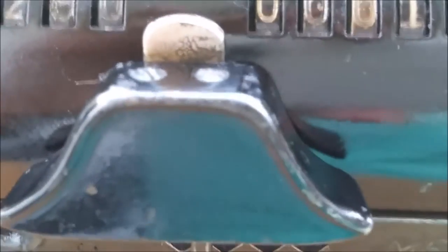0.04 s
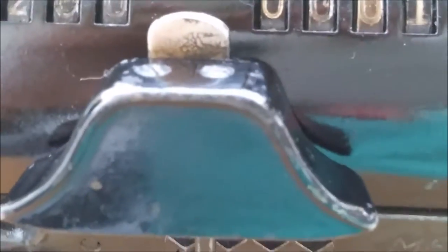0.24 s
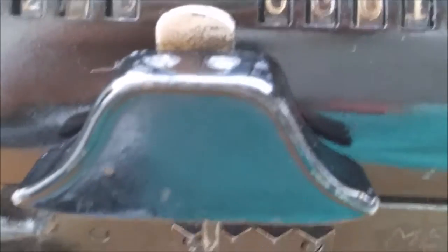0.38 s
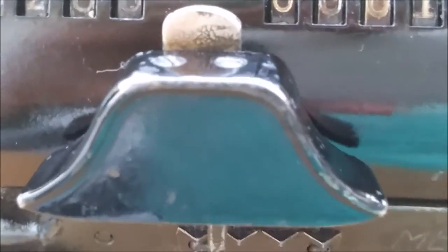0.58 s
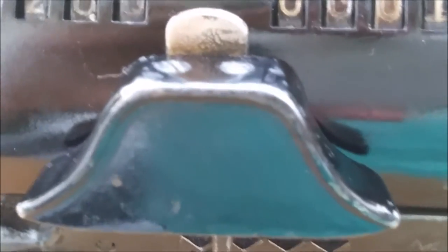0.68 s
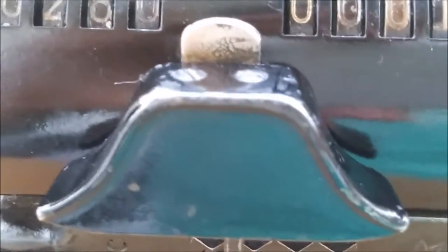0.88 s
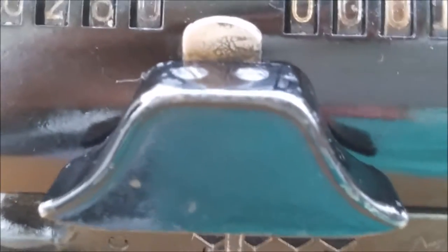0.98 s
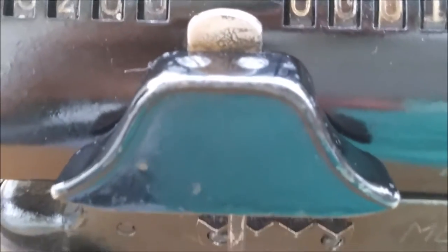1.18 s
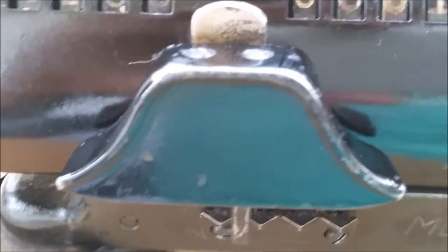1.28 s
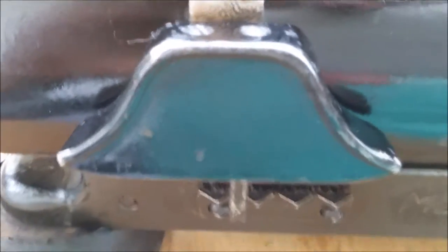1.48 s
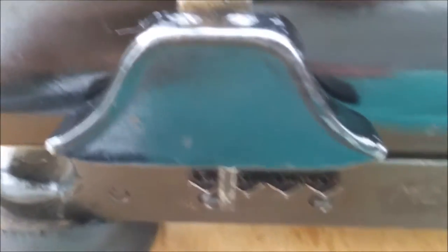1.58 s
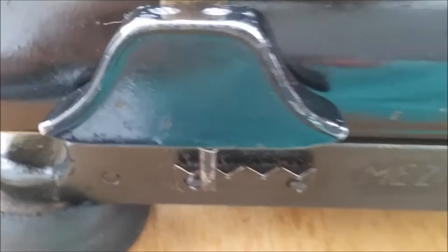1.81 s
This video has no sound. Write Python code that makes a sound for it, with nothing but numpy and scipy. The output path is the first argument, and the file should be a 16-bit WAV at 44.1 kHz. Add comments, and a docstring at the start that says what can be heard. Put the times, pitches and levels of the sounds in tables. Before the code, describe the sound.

A mechanical calculator is operated once, very close: a short metal scrape with ticking latches, hard steel clacks, a fast ratchet buzz that slows into fading ticks, then faint knocks in a small quiet room.

```python
"""A mechanical calculator is worked once, close up in a small quiet room: noise bursts and ringing steel modes.
Its slide scrapes (grainy noise) and latches tick; steel parts clack hard. A driven ratchet whirrs (near-identical
clicks at tooth rate), then coasts to rest, its pawl ticking ever slower over pinging spring chirps.
Soft knocks (filtered bursts) come early and again after the wheel stops, over low room noise and a faint hum."""
import sys
import numpy as np
from scipy import signal
from scipy.fft import rfft, irfft, next_fast_len
from scipy.io import wavfile
from scipy.ndimage import uniform_filter1d, minimum_filter1d, map_coordinates

SR = 44100
rng = np.random.default_rng(int(sys.argv[2]) if len(sys.argv) > 2 else 0)


def log_audio(samples):
    """Write samples as a 16-bit WAV file to the path given in sys.argv[1]."""
    # one column per channel
    frames = np.atleast_2d(samples).T
    # limit to full scale, then quantise
    limited = np.clip(frames, -1, 1)
    pcm = np.round(limited * 32767).astype(np.int16)
    wavfile.write(sys.argv[1], SR, pcm)


N = 81585
T = np.arange(N) / SR
AGE = np.arange(SR // 5) / SR  # s since a contact
TOP_HZ = 16900
FRAME_DB, PAWL_DB = -26, -19  # ring levels relative to their hit
TOOTH_T60_S = .006
REBOUND_S = .0033
SPRING_HZ = 4450

# ringing modes of the steel frame: pitch_hz, level_db (relative), t60_s
FRAME_MODES = [(1130, -5, .08), (1243, -4, .11), (1884, -1, .07), (2588, 5, .05), (4163, -1, .06),
               (4310, 1, .055), (5594, 0, .065), (6748, 1, .065), (6900, 0, .065), (8010, 1, .055),
               (8690, 0, .07)]
# ringing modes of the pawl: pitch_hz, level_db (relative), t60_s
PAWL_MODES = [(1235, -8, .07), (4560, -5, .03), (7650, -1, .05), (8180, 0, .04), (8455, 0, .04),
              (9840, -7, .05)]


def amp(db):
    """Decibels to gain."""
    return 10 ** (np.asarray(db) / 20)


def unit(x):
    """Scale to rms 1."""
    return x / np.sqrt(np.mean(x ** 2) + 1e-20)


def fade(t60_s):
    """Exponential decay, 60 dB in t60_s."""
    return np.exp(-np.log(1000) * AGE / t60_s)


def add(track, start_s, sound):
    """Mix a sound into a track, cut at the track's end."""
    part = track[round(start_s * SR):][:len(sound)]
    part += sound[:len(part)]


def coloured(x, points):
    """Causal minimum-phase filter of unit power through (Hz, dB) points."""
    size = next_fast_len(2 * N)
    hz, db = np.transpose(points)
    log_hz = np.log(np.fft.rfftfreq(size, 1 / SR) + 1)
    gain = unit(amp(np.interp(log_hz, np.log(hz), db)))
    # fold the cepstrum forward in time: minimum phase
    cepstrum = irfft(np.log(gain), size)
    cepstrum[1:size // 2] *= 2
    cepstrum[size // 2 + 1:] = 0
    return irfft(rfft(x, size) * np.exp(rfft(cepstrum)), size)[:N]


def burst(t60_s):
    """Dense, quickly dying vibration of one contact; equal energy for equal t60_s."""
    envelope = fade(t60_s)
    noise = unit(rng.standard_normal(len(AGE)) * envelope)
    return noise * np.sqrt(np.mean(envelope ** 2))


def ring(modes, attack_s=0.00013):
    """Decaying modes, each struck with slightly different force and a random phase."""
    tones = np.zeros(len(AGE))
    for hz, db, t60_s in modes:
        level = amp(db + rng.normal(0, 0.91))
        tones += level * fade(t60_s) * np.sin(2 * np.pi * (hz * AGE + rng.random()))
    return tones * (1 - np.exp(-AGE / attack_s))


def ping(hz, chirp_hz=1100, chirp_max_s=.002, t60_s=.024):
    """Flicked spring: high notes arrive first, so it swells while falling to a slightly random pitch."""
    onset = np.exp(-AGE / (chirp_max_s * rng.uniform(.5, 1)))
    pitch_hz = hz * rng.normal(1, .025) + chirp_hz * onset
    turns = np.cumsum(pitch_hz) / SR + rng.random()
    return 2 * (1 - onset) * fade(t60_s) * np.sin(2 * np.pi * turns)


def teeth(speed, force):
    """(start_s, level_db) of each tooth passing the pawl: whole turns of the integrated tooth rate."""
    s, rate = np.transpose(speed)
    t = np.arange(s[0], s[-1], 1 / SR)
    passed = np.cumsum(np.interp(t, s, rate)) / SR
    times = np.interp(np.arange(passed[-1]), passed, t)
    levels_db = np.interp(times, *np.transpose(force)) + rng.standard_normal(len(times))
    return zip(times, levels_db)


def room_tone(floor_db=-72, hum_hz=98.3, hum_db=-77, swell_s=0.059):
    """Steady low noise, a faint phase-wavering hum and slight hollow noise swells."""
    # room noise spectrum: pitch_hz, level_db (relative)
    noise_colour = [(25, -18.5), (100, -5), (260, -6.5), (440, -17), (700, -13.5), (1600, -23),
                    (16000, -35.5)]
    # noise swells: peak_s, level_db, centre_hz
    swells = [(0.036, -66, 638), (1.16, -71, 634), (1.801, -70.5, 270.7)]
    # swell spectrum: centre_multiple, level_db (relative)
    swell_colour = [(.75, -29.5), (1, -8.5), (1.45, -21), (5, -34.5)]
    out = amp(floor_db) * coloured(rng.standard_normal(N), noise_colour)
    waver_rad = map_coordinates(rng.standard_normal(N), [T * 10])
    out += amp(hum_db) * np.sin(2 * np.pi * hum_hz * T + waver_rad)
    for s, db, hz in swells:
        noise = coloured(rng.standard_normal(N), [(k * hz, g) for k, g in swell_colour])
        out += amp(db) * np.exp(-((T - s) / swell_s) ** 2) * noise
    return out


def slide(grain_db=4, grains_per_s=900):
    """Metal parts rub in tiny uneven slips: noise with a randomly varying level."""
    # sliding friction: time_s, level_db
    friction = [(0.119, -63), (0.179, -59.5), (.184, -33), (0.203, -41.5), (0.206, -58.5), (0.217, -35.5),
                (0.282, -37), (.298, -45.5), (.320, -41), (0.365, -34.5), (0.387, -50), (0.429, -76),
                (0.441, -39), (.530, -32), (.590, -42.5), (.700, -48), (.745, -65), (.88, -82)]
    # scrape spectrum: pitch_hz, level_db (relative)
    colour = [(100, -29), (850, -10), (1180, 2.5), (1500, -7.5), (1900, -1.5), (2900, -9.5), (4300, 2),
              (5600, -4), (8300, -3.5), (10500, -9.5), (12500, -23.5)]
    s, db = np.transpose(friction)
    slips = map_coordinates(rng.standard_normal(N), [T * grains_per_s])
    grit = unit(rng.standard_normal(N) * amp(grain_db * slips))
    moving = (T > s[0]) * (T < s[-1])
    return coloured(grit * amp(np.interp(T, s, db)) * moving, colour)


def nudges(t60_s=0.029, dip_db=-11, top_db=-25):
    """Soft knocks of loose parts and of the case: bursts with one bright peak and some bass."""
    # knocks: start_s, level_db, brightest_hz, bass_db (relative)
    knocks = [(0.1228, -50.5, 1770, -14), (0.2784, -32, 1230, -38), (1.0462, -63.5, 3780, -25),
              (1.1444, -74, 4500, -14), (1.7164, -52, 1652, 6.5), (1.7290, -50, 4170, 10)]
    out = np.zeros(N)
    for s, db, hz, bass_db in knocks:
        colour = [(40, top_db), (130, bass_db), (hz / 2, dip_db), (hz, 0), (2 * hz, dip_db), (TOP_HZ, top_db)]
        add(out, s, amp(db) * coloured(burst(t60_s), colour))
    return out


def latches(t60_s=.008, spring_hz=4016, spring_db=-12.5):
    """Small sprung parts click into place, ringing the frame and pinging a spring."""
    # latch ticks: start_s, level_db
    ticks = [(0.1891, -22), (0.2206, -16), (0.2268, -20), (0.2314, -23), (0.2421, -23), (.2481, -26.5),
             (.2535, -28.5), (0.2666, -17.5), (0.2737, -23.5), (0.2819, -24), (.2922, -31), (0.3529, -25.5),
             (0.3576, -20.5), (0.4518, -15), (0.5372, -15.5), (0.5535, -14.5), (0.5578, -16.5),
             (0.5646, -16), (0.6727, -29.5)]
    # tick spectrum: pitch_hz, level_db (relative)
    colour = [(300, -35), (1150, -15.5), (2800, -18), (5500, -9.5), (6800, 2.5), (8300, 2), (9200, -4.5),
              (14000, -24.5)]
    hits, body = np.zeros((2, N))
    for s, db in ticks:
        add(hits, s, amp(db) * burst(t60_s))
        add(body, s, amp(db + FRAME_DB) * ring(FRAME_MODES))
        add(body, s, amp(db + spring_db) * ping(spring_hz))
    return coloured(hits, colour) + body


def clacks(thump_hz=200, thump_t60_s=.07, crack_db=-2, crack_t60_s=0.0024):
    """Steel hits steel: a crack, the frame's ring and a small dull thump of the case."""
    # hard clacks: start_s, level_db, t60_s, thump_db
    strikes = [(0.3076, -2.5, 0.018, -46.5), (0.3135, -8, 0.019, -49.5), (.3430, -8, .021, -57),
               (0.4538, -7.5, 0.016, -66)]
    # clack spectrum: pitch_hz, level_db (relative)
    colour = [(500, -41.5), (850, -17.5), (1150, -14), (1450, -17.5), (1900, 0), (2200, -6), (2550, 0),
              (2900, -5), (5100, 0), (8500, 0.5), (10400, -4), (12600, -11.5), (14500, -9.5)]
    hits, body, thumps = np.zeros((3, N))
    for s, db, t60_s, thump_db in strikes:
        add(hits, s, amp(db) * (burst(t60_s) + amp(crack_db) * burst(crack_t60_s)))
        add(body, s, amp(db + FRAME_DB) * ring(FRAME_MODES))
        add(thumps, s, amp(thump_db) * burst(thump_t60_s))
    thump_colour = [(thump_hz / 10, -24), (thump_hz, 0), (thump_hz * 10, -30)]
    return coloured(hits, colour) + body + coloured(thumps, thump_colour)


def ratchet(alike=.7, chatter_db=-9, spring_db=-12):
    """Pawl rattles over the driven wheel and chatters between teeth; like clicks give the whirr a pitch."""
    # driven wheel speed: time_s, teeth_per_s
    speed = [(.4385, 206), (.469, 205), (.475, 243), (.497, 252), (.516, 275), (.529, 255)]
    # driven wheel force: time_s, level_db
    force = [(0.439, -21), (.462, -14), (.472, -10), (.490, -15), (.499, -17), (0.518, -10), (0.527, -11)]
    # tooth spectrum: pitch_hz, level_db (relative)
    colour = [(300, -45), (2900, -25), (4600, -12), (5700, -13), (6600, 1), (8500, 5), (9300, -7.5),
              (10900, -3.5), (12500, -24)]
    hits, body = np.zeros((2, N))
    click = burst(TOOTH_T60_S)
    for s, db in teeth(speed, force):
        # alike: power share of the click common to all teeth
        tooth = np.sqrt(alike) * click + np.sqrt(1 - alike) * burst(TOOTH_T60_S)
        add(hits, s, amp(db) * tooth)
        add(hits, s + REBOUND_S * rng.uniform(0.56, 1), amp(db + chatter_db) * burst(TOOTH_T60_S))
        add(body, s, amp(db + PAWL_DB) * ring(PAWL_MODES))
        add(body, s, amp(db + spring_db) * ping(SPRING_HZ))
    return coloured(hits, colour) + body


def coasting(level_db=-3.5, rebound_db=-5, spring_db=-2.5, sag_hz_per_s=2000):
    """Wheel runs out: the pawl lands twice per tooth and its spring pings, lower as the wheel slows."""
    # coasting wheel speed: time_s, teeth_per_s
    speed = [(.572, 170), (.600, 150), (.673, 138), (.7743, 77), (.822, 54)]
    # coasting wheel force: time_s, level_db (before level_db)
    force = [(.572, -25), (.632, -30), (.640, -39), (.668, -39), (.672, -30.5), (.703, -32.5),
             (.712, -40.5), (.755, -47), (.822, -53)]
    # the wheel tips over one more tooth and stops: start_s, level_db (before level_db)
    last_tooth = (.857, -57)
    # tooth spectrum: pitch_hz, level_db (relative)
    colour = [(300, -22.5), (1150, 0), (3300, -14), (4400, -7), (5800, -12), (6600, 3.5), (7500, -5.5),
              (8300, 8.5), (9300, -4), (11500, -23)]
    hits, body = np.zeros((2, N))
    for s, db in [*teeth(speed, force), last_tooth]:
        spring_hz = SPRING_HZ - sag_hz_per_s * (s - speed[0][0])
        add(hits, s, amp(db) * burst(TOOTH_T60_S))
        add(hits, s + REBOUND_S, amp(db + rebound_db) * burst(TOOTH_T60_S))
        add(body, s, amp(db + spring_db) * ping(spring_hz))
        add(body, s, amp(db + PAWL_DB) * ring(PAWL_MODES))
    return amp(level_db) * (coloured(hits, colour) + body)


def scene(room_t60_s=0.12, room_db=-16.5, room_attack_s=.004):
    """The machine, its short diffuse room tail and the room's own noise."""
    machine = slide() + nudges() + latches() + clacks() + ratchet() + coasting()
    tail = rng.standard_normal(len(AGE)) * fade(room_t60_s) * (1 - np.exp(-AGE / room_attack_s))
    room = signal.fftconvolve(machine, tail / np.linalg.norm(tail))[:N]
    return (machine + amp(room_db) * room + room_tone())[None]


def record(dry):
    """A fast limiter holds the loudest peaks; a steep low-pass sets the band limit."""
    size = SR // 1000  # 1 ms
    peak_gain = 1 / np.maximum(np.abs(dry), 1)
    gain = uniform_filter1d(minimum_filter1d(peak_gain, size), size)
    low_pass = signal.cheby2(20, 100, TOP_HZ, fs=SR, output="sos")
    return signal.sosfilt(low_pass, dry * gain)


dry = scene()
out = record(dry)
log_audio(out)
```